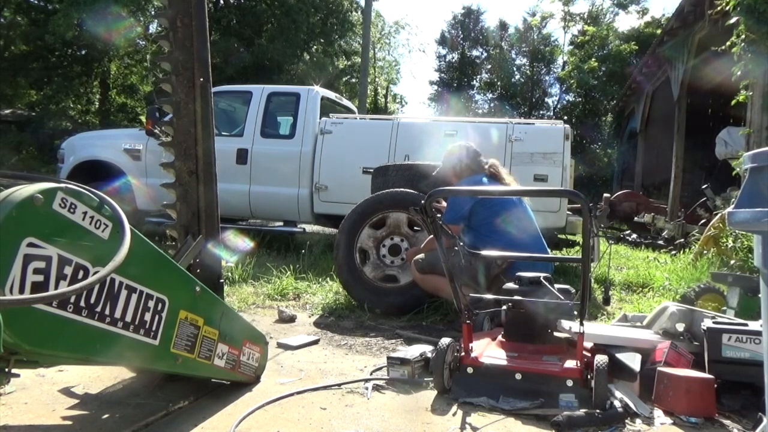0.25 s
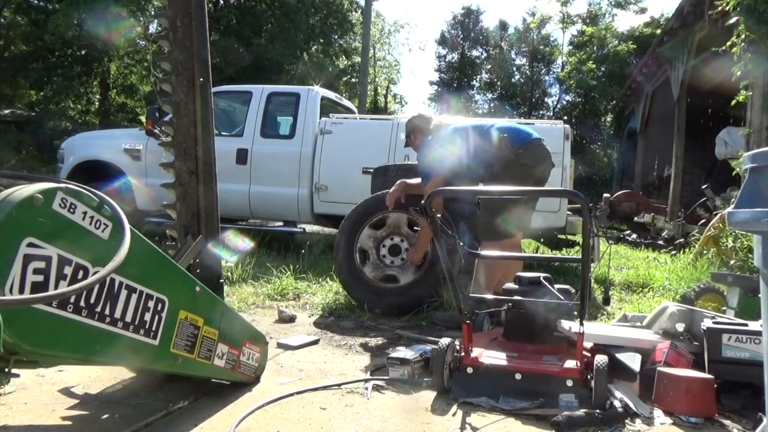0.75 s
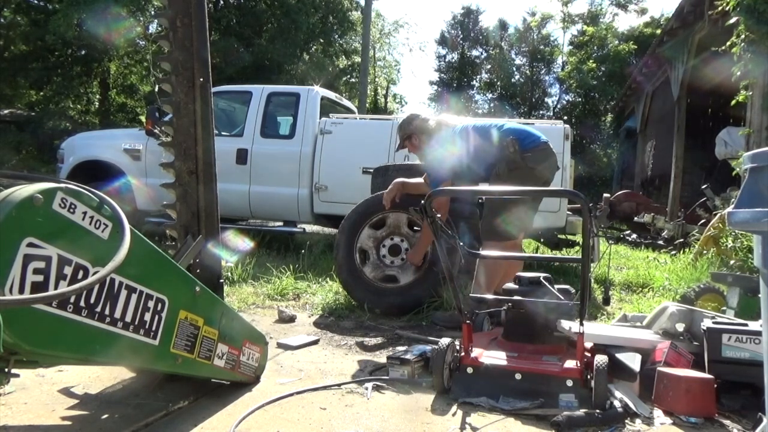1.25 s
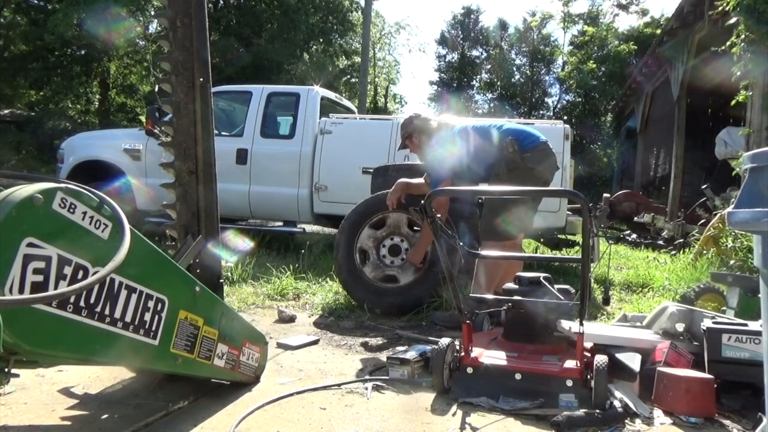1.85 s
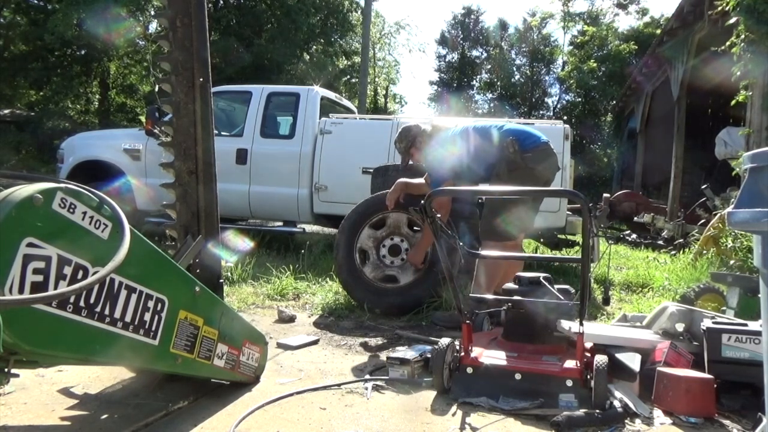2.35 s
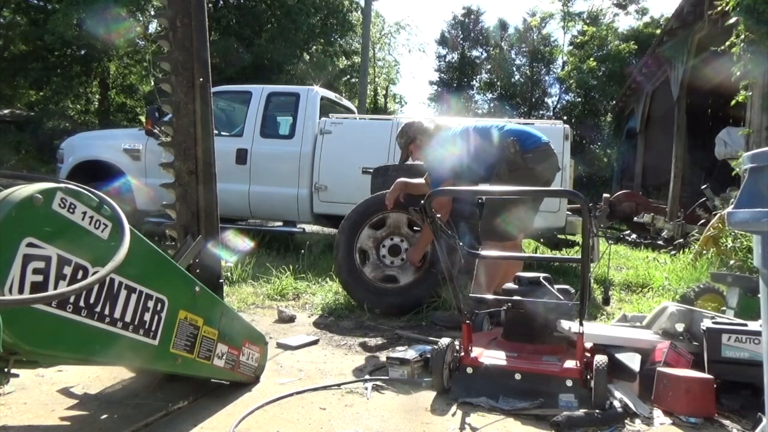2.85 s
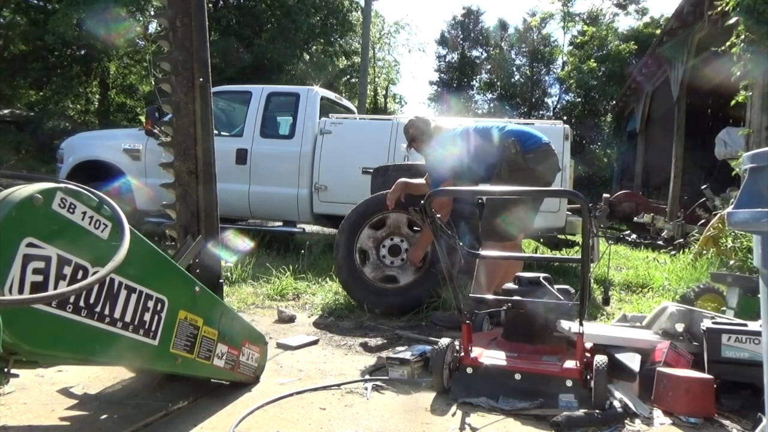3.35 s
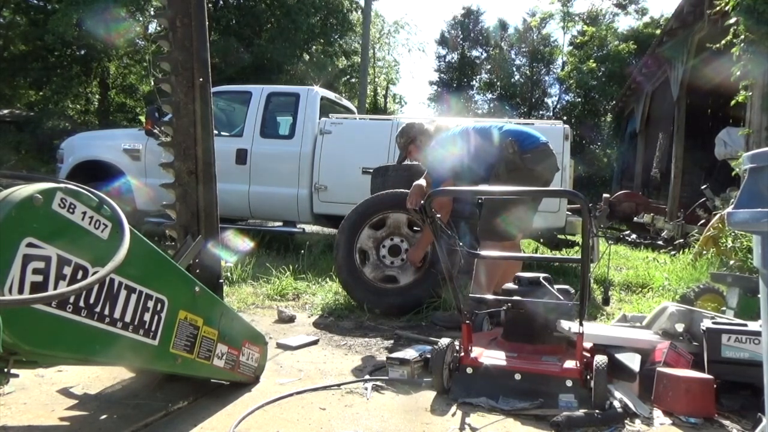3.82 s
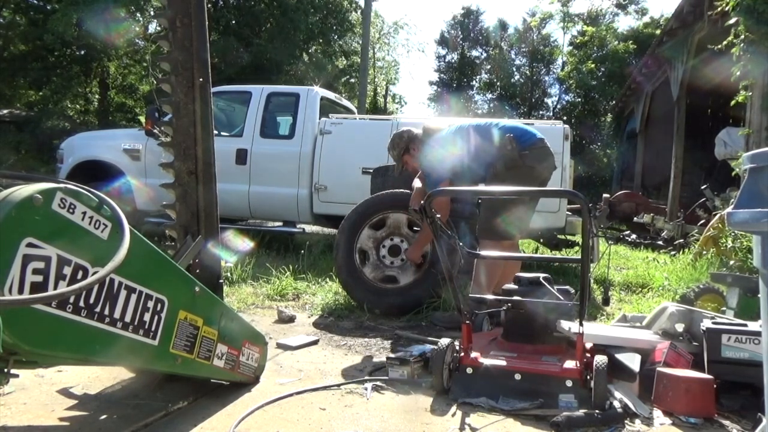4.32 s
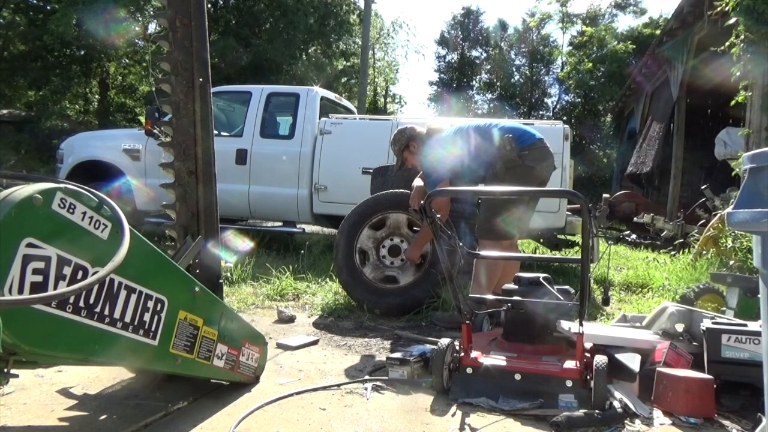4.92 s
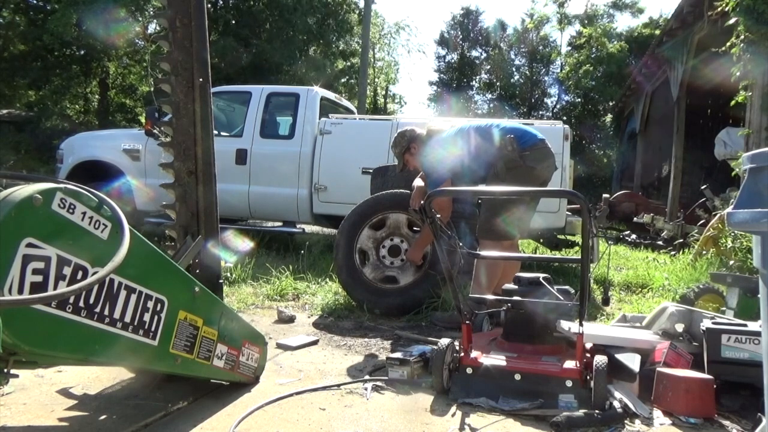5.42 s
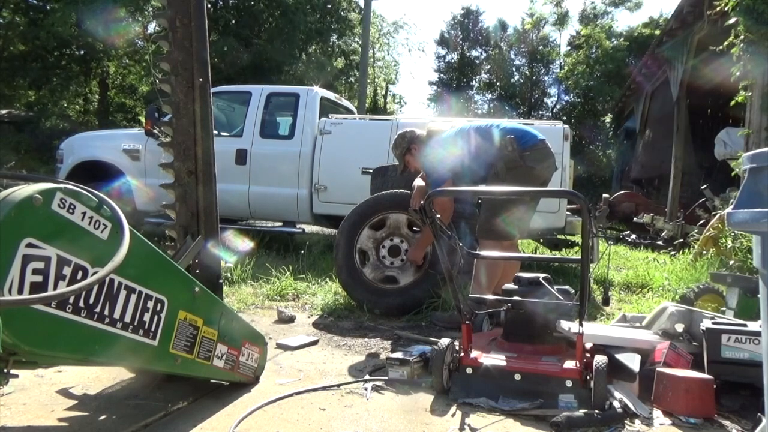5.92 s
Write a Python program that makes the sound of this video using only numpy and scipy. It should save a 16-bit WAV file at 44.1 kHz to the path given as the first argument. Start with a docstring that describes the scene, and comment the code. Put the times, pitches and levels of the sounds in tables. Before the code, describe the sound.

A tire deflates with a constant hiss and piercing whistle, the air briefly squeaking and sputtering under fingers at the valve.

```python
"""Air escaping from a tire valve

A truck tire empties in a yard, a few metres away. The turbulent jet hisses, and resonance of the valve
bore holds a pure whistle, with a flutter and a lower, wavering edge tone beside it. Fingers at the
valve make the air squeak, then spray in spurts. The tire is bumped once; later come soft knocks."""
import sys
import numpy as np
from scipy import signal
from scipy.fft import rfft, irfft
from scipy.io import wavfile
from scipy.ndimage import uniform_filter1d

SR = 44100
rng = np.random.default_rng(int(sys.argv[2]) if len(sys.argv) > 2 else 0)


def transcribe(u):
    """Save the signal u as a 16-bit wav file named by the first command-line argument.

    u: samples, shape (n,) or (channels, n), limited to [-1, 1]; the rate is SR.
    q: integer samples, one column per channel.
    """
    v = np.clip(np.atleast_2d(u).T, -1, 1)
    q = np.round(v * 32767).astype(np.int16)
    wavfile.write(sys.argv[1], SR, q)


N = 272097
TIME = np.arange(N) / SR
WHISTLE_HZ, FLUTTER_HZ = 2400.3, 326

# Fundamental of the whistle: t/s, level/dB
WHISTLE_LEVEL = [(0, -29), (.5, -28.7), (1.0, -31), (2.97, -31), (3.18, -28), (4.16, -24.5), (4.32, -26.5),
                 (5.2, -26), (5.8, -23), (6.17, -23.5)]
# Its overtones: harmonic number, level/dB
WHISTLE_OVERTONES = [(2, -48), (3, -55.5), (4, -58)]
# Its sidebands: multiple of the whistle, multiple of the flutter (order), relative level/dB
SIDEBANDS = [(1, -1, 3), (1, 1, 0.5), (1, 3, -2.5), (2, -1, -6), (2, 1, -6), (1, -2, -1.5), (1, 2, -12.5),
             (0, 2, -17.5), (0, 3, -15), (0, 4, -14)]
# Base level of the even-order sidebands: t/s, level/dB
EVEN_SIDEBAND_LEVEL = [(0, -45.5), (1.8, -51), (2.5, -48.5), (4.8, -45.5), (5.42, -39), (5.7, -42.5),
                       (6.17, -40)]
# Stereo width of the hiss, nearly mono until about 4 s and then wide, with the whistle slightly
# to the left: t/s, hiss side over mid/dB, whistle left over right/dB
STEREO_WIDTH = [(3.05, -28, 0), (3.6, -24, 1.1), (4.0, -8.5, 1.4), (4.8, -5.3, 1.3), (6.17, -5.3, 1.3)]
# Fundamental of the edge tone: t/s, f/Hz
EDGE_PITCH = [(0, 1948), (.35, 1977), (1.3, 1965), (4.1, 1963), (6.17, 1941)]
# Its partials: harmonic number, relative level/dB
EDGE_PARTIALS = [(1, -1.5), (2, -5.5), (3, -9), (4, -11.5), (5, -14)]
# Spectrum of the free jet: f/Hz, relative level/dB
HISS_SPECTRUM = [(2500, -8.5), (3200, -5), (4200, -2.5), (5000, -0.5), (7500, 1), (9500, 0.5), (11000, 0),
                 (13000, 0), (15000, 0.5), (16000, 0.5)]
# Spectrum of the rush in the bore: f/Hz, relative level/dB
RUSH_SPECTRUM = [(200, -17), (500, -12), (800, -8), (1200, -3.5), (1650, 1), (1900, -2), (2300, 5),
                 (2550, -2), (3000, -3.5), (4000, -5), (7000, -27)]
# Strength of that rush: t/s, level/dB
RUSH_LEVEL = [(0, -43), (.45, -40), (1.9, -43), (2.35, -39), (2.7, -41.5), (4.8, -43), (5.3, -41),
              (6.17, -42)]
# The jet brushes the fingers as they close in and draw away: t/s, level/dB, cavity resonance f/Hz
SPRAY_FLOW = [(1.9, -46, 9000), (2.35, -35.5, 9100), (2.7, -36, 6860), (2.95, -35.5, 5870),
              (3.5, -42.5, 6050), (3.8, -42.5, 6700), (4.3, -50, 7100)]
# Spectrum of the spray: f/Hz, relative level/dB
SPRAY_SPECTRUM = [(1000, -37), (3400, -8), (4200, 1), (5500, -1.5), (8000, -0.5), (11000, -3.5),
                  (14000, -5), (16000, -9.5)]
# Spurts of the spray: onset t/s, duration/s, level/dB
SPURTS = [(2.38, 0.068, -30), (2.508, 0.044, -27), (2.734, 0.012, -22), (2.744, 0.06, -28.5),
          (2.801, .021, -23), (2.853, 0.013, -25.5), (2.886, .016, -30), (2.969, 0.03, -28.5),
          (2.999, .024, -27.5), (3.051, 0.035, -30.5), (3.09, .018, -29), (3.173, 0.047, -29),
          (3.393, 0.073, -34), (3.459, 0.024, -24.5), (3.481, 0.043, -24), (3.661, .02, -31.5),
          (3.687, 0.035, -30.5), (4.03, .07, -33.5)]
# Air pinched at the valve: onset t/s, duration/s, level/dB, decay/(dB/s), upper spectral peak f/Hz
SQUEAKS = [(.346, .17, -24, 127, 10800), (0.631, .015, -30.5, 0, 12000), (0.665, .015, -28, 0, 13000),
           (.895, .035, -35, 0, 11900), (1.418, .1, -28.5, 65, 12100), (1.803, .038, -27, 450, 13400)]
# Bands of one bump against the tire: centre f/Hz, level/dB
BUMP_BANDS = [(90, -38.5), (350, -33), (1500, -26.5)]
# Soft knocks of handling: t/s, level/dB
KNOCKS = [(4.976, -30.5), (5.037, -30), (5.063, -34), (5.135, -32), (5.336, -28), (5.352, -31.5),
          (5.433, -34), (5.641, -33), (5.669, -31)]
# Spectrum of the open air: f/Hz, relative level/dB
YARD_SPECTRUM = [(15, 0), (40, 0), (100, -1), (200, 0), (400, -1), (800, -0.5), (2000, -22), (8000, -59)]


def whistle(sideband_phase_rad=1.2, odd_fade_db_per_s=1.9):
    """Resonance of the bore locks the tone to one pitch; modulation by the flutter adds sidebands."""
    level_db, = follow(WHISTLE_LEVEL)
    phase = 2 * np.pi * WHISTLE_HZ * TIME + 0.033 * drift(60)
    fundamental = amp(level_db + 0.5 * drift(18)) * np.sin(phase)
    overtones = sum(amp(db + 1.1 * drift(17)) * np.sin(round(k) * phase) for k, db in WHISTLE_OVERTONES)
    flutter_phase = 2 * np.pi * np.cumsum(FLUTTER_HZ + 1.184 * drift(16.5)) / SR
    odd_db = -47 - odd_fade_db_per_s * TIME  # odd orders fade as the tire empties
    even_db, = follow(EVEN_SIDEBAND_LEVEL)
    sidebands = np.zeros(N)
    for k, order, db in SIDEBANDS:
        base_db = odd_db if round(order) % 2 else even_db
        gain = amp(base_db + db + 2.0 * drift(11.5))
        sidebands += gain * np.sin(round(k) * phase + round(order) * flutter_phase + sideband_phase_rad)
    _, left_db = follow(STEREO_WIDTH)
    return np.sqrt(2) * (pan(fundamental + overtones, left_db) + sidebands)


def jet(shift_s=4.18, shift_takes_s=0.15, drop_db=3, recovery_db_per_s=1.13):
    """Turbulence radiates broadband noise: a hiss from the free jet, a darker rush from the bore."""
    since_shift = np.maximum(TIME - shift_s, 0)  # the fingers shift: the hiss dips, then recovers
    dip_db = drop_db * np.minimum(since_shift / shift_takes_s, 1)
    hiss_db = -34.5 - dip_db + recovery_db_per_s * since_shift
    rush_db, = follow(RUSH_LEVEL)
    width_db, _ = follow(STEREO_WIDTH)
    hiss = noise(lambda t, hz: colour(HISS_SPECTRUM, hz), side_db=width_db, patchy_db=1.03)
    rush = noise(lambda t, hz: colour(RUSH_SPECTRUM, hz), side_db=width_db - 12.5, patchy_db=1.57)
    turbulence = amp(.5 * drift(28))
    return pan(hiss * amp(hiss_db) + rush * amp(rush_db), left_db=0.66) * turbulence


def edge_tone(wander_hz=2.5, fade_db_per_s=1.05):
    """Flow oscillates at the valve lip; the tone wanders with the flow and fades with the pressure."""
    hz = follow(EDGE_PITCH)[0] + wander_hz * drift(2.99)
    level_db = -42 - fade_db_per_s * TIME + 0.7 * drift(4.7)
    phase = 2 * np.pi * np.cumsum(hz + 2 * drift(57)) / SR
    return np.sqrt(2) * sum(amp(level_db + db + 2.43 * drift(25)) * np.sin(round(k) * phase)
                            for k, db in EDGE_PARTIALS)


def spray(ripple_db=4.5):
    """Air glances off the fingers; the cavity under them resonates at multiples of one frequency."""
    def cavity_db(t, hz):
        _, resonance_hz = follow(SPRAY_FLOW, t)
        return colour(SPRAY_SPECTRUM, hz) + ripple_db * np.cos(2 * np.pi * hz / resonance_hz)
    level_db, _ = follow(SPRAY_FLOW)
    brushing = (TIME > SPRAY_FLOW[0][0]) & (TIME < SPRAY_FLOW[-1][0])
    flow = amp(level_db + 2.7 * drift(45)) * brushing
    spurts = np.zeros(N)
    for start, length, db in SPURTS:
        progress = np.linspace(0, 1, int(length * SR))
        add(spurts, start, amp(db) * np.sin(np.pi * progress ** 0.91))  # opens faster than it closes
    return noise(cavity_db, side_db=-44, patchy_db=2.2) * np.hypot(flow, spurts)


def squeaks(period_s=.0205, pinch_hz=3218, settle_s=.024, dulling_db_per_s=130):
    """Flow through a narrow gap oscillates in ragged, falling chirps that lengthen until they merge."""
    out, jitter, rasp = np.zeros(N), drift(570), drift(900)
    for start, length, db, fade_db_per_s, bright_hz in SQUEAKS:
        scatter = rng.uniform(-0.95, 1, size=(20, 3))
        for age, (loud, sharp, slide) in zip(np.arange(0, length, period_s), scatter):
            onset = start + age
            progress = np.linspace(0, 1, int((0.0136 + 0.166 * age) * SR))
            pinch = np.exp(-age / settle_s)  # as it eases, the pitch settles back on the whistle
            centre_hz = (WHISTLE_HZ + (pinch_hz - WHISTLE_HZ) * pinch) * (1 + .035 * sharp)
            sweep = 0.0816 * (1 + slide) + .11 * pinch  # share of the pitch
            roughness = 1 + 0.033 * jitter[int(onset * SR):][:len(progress)]
            hz = centre_hz * (1 + sweep * (.5 - progress)) * roughness
            gain = amp(db - fade_db_per_s * age + 1.5 * loud)
            add(out, onset, gain * chirp(hz, bright_hz, bright_db=-dulling_db_per_s * age))
    return out * (1 + 0.44 * rasp)


def chirp(hz, bright_hz, bright_db, low_hz=5050, low_db=-8.5, width_hz=2200, skirt_db=-11):
    """Two formants weight six gliding harmonics; the upper one and a flat skirt follow bright_db."""
    phase = 2 * np.pi * (np.cumsum(hz) / SR + rng.random())
    tone = np.zeros(len(hz))
    for k in range(1, 7):
        low = amp(low_db) * np.exp(-((k * hz - low_hz) / width_hz) ** 2)
        bright = amp(bright_db) * np.exp(-((k * hz - bright_hz) / width_hz) ** 2)
        tone += (amp(skirt_db + bright_db) + low + bright) * np.sin(k * phase)
    return unit(tone) * signal.windows.tukey(len(hz), .6)


def knocks(t60_s=0.033, bump_s=.349, knock_hz=1365, rattle_db=-36.5):
    """Heavily damped impacts die at once: one full bump, then light knocks amid a faint rattle."""
    out, t = np.zeros((2, N)), np.arange(SR // 8) / SR
    decay = np.exp(-np.log(1000) * t / t60_s)
    rattle = [(s, rattle_db) for s in rng.uniform(KNOCKS[0][0], KNOCKS[-1][0], size=14)]
    bump = [(bump_s, db, hz, 0) for hz, db in BUMP_BANDS]
    taps = [(s, db, knock_hz, 1) for s, db in KNOCKS + rattle]
    for onset, db, hz, stereo_spread in bump + taps:
        band = signal.butter(2, [hz / 2, hz * 2.07], "band", fs=SR, output="sos")
        blow = signal.sosfilt(band, decay * rng.standard_normal((2, len(t))))
        mid, side = amp(db) * np.linalg.norm(decay) * blow / np.linalg.norm(blow, axis=1, keepdims=True)
        add(out[0], onset, mid + stereo_spread * side)
        add(out[1], onset, mid - stereo_spread * side)
    return out


def yard_echo(x, t60_s=0.12, wet_db=-16):
    """Scattering from ground and machines adds sparse reflections, different on each side."""
    t = np.arange(SR // 4) / SR
    reflections = rng.standard_normal((2, len(t))) * (rng.random((2, len(t))) < .05)
    reflections *= np.exp(-np.log(1000) * t / t60_s)
    reflections /= np.linalg.norm(reflections, axis=1, keepdims=True)
    return x + amp(wet_db) * signal.fftconvolve(x, reflections, axes=1)[:, :N]


def open_air():
    """Ambient noise with its energy at low frequencies is heard as a murmur."""
    murmur = noise(lambda t, hz: colour(YARD_SPECTRUM, hz), side_db=-8.0, patchy_db=1, size=2048)
    return pan(amp(-54.5) * murmur, left_db=-2.0)


def noise(spectrum_db, side_db, patchy_db, size=512):
    """Random Fourier components sum to stereo noise of spectrum_db(t, hz), with drifting patches."""
    hop = size // 4
    t, hz = np.arange(N // hop + 5)[:, None] * hop / SR, np.fft.rfftfreq(size, 1 / SR)
    real, imag = rng.standard_normal((2, 2, len(t), len(hz)))
    patches = uniform_filter1d(rng.standard_normal(real.shape[1:]), size=10, axis=0)
    patches = unit(uniform_filter1d(patches, size=12, axis=1))
    spectra = (real + 1j * imag) * amp(spectrum_db(t, hz) + patchy_db * patches)
    mid, side = signal.istft(spectra.swapaxes(1, 2), nperseg=size, noverlap=size - hop)[1][:, :N]
    return unit(mid) + amp(side_db) * unit(side) * np.array([[1], [-1]])


def drift(rate_hz):
    """Low-pass noise gives a random fluctuation of unit rms, mostly slower than the rate."""
    hz = np.fft.rfftfreq(N, 1 / SR)
    return unit(irfft(rfft(rng.standard_normal(N)) / (1 + (hz / rate_hz) ** 2), N))


def amp(db):
    """Amplitude ratio of a level in decibels."""
    return 10 ** (np.asarray(db) / 20)


def unit(x):
    """Normalisation to unit rms."""
    return x / np.sqrt(np.mean(x ** 2) + 1e-20)


def follow(rows, t=TIME):
    """Linear interpolation of each column of a time table at the times t."""
    times, *columns = np.transpose(rows)
    return [np.interp(t, times, column) for column in columns]


def colour(points, hz):
    """Interpolation of a spectrum in dB on a log-frequency axis."""
    f, db = np.transpose(points)
    return np.interp(np.log(hz + 1), np.log(f), db)


def add(mix, onset_s, sound):
    """Superposition of a short sound on the mix."""
    part = mix[round(onset_s * SR):][:len(sound)]
    part += sound[:len(part)]


def pan(x, left_db):
    """A level difference between the channels sets the direction of a sound."""
    return x * amp(left_db * np.array([[.5], [-.5]]))


def scene():
    """Superposition of the valve, the handling sounds and the open air."""
    return whistle() + edge_tone() + jet() + spray() + yard_echo(squeaks() + knocks()) + open_air()


def record(dry, cutoff_hz=15900):
    """A linear-phase low-pass filter limits the bandwidth."""
    low_pass = signal.firwin(511, cutoff_hz, window=("kaiser", 9), fs=SR)
    return signal.oaconvolve(dry, low_pass[None], "same", axes=1)


dry = scene()
out = record(dry)
transcribe(out)
```